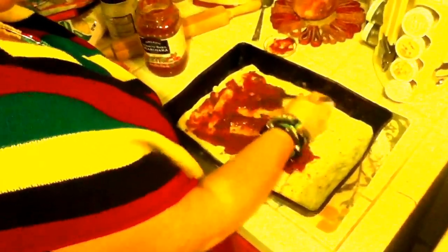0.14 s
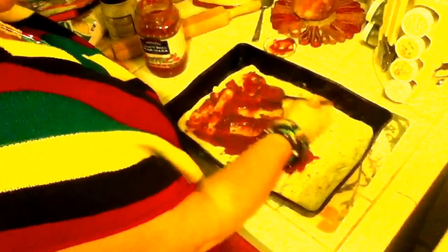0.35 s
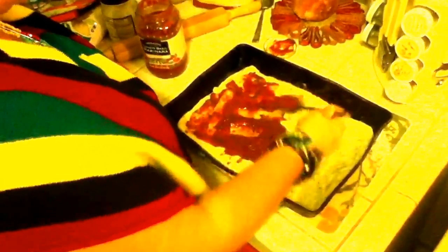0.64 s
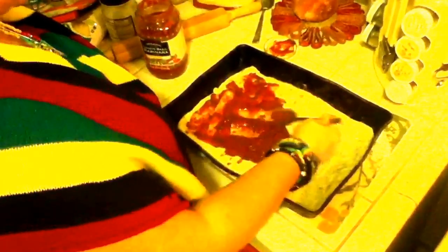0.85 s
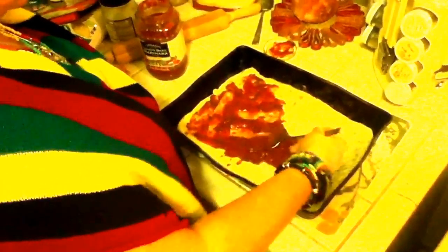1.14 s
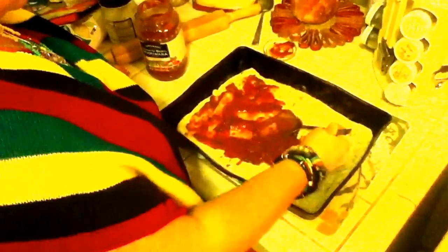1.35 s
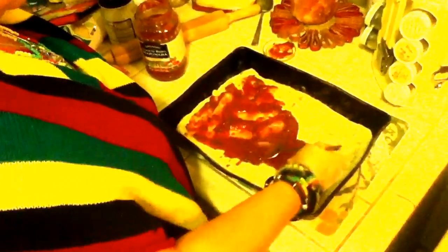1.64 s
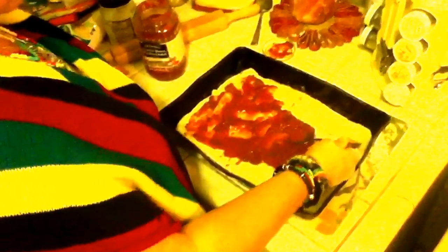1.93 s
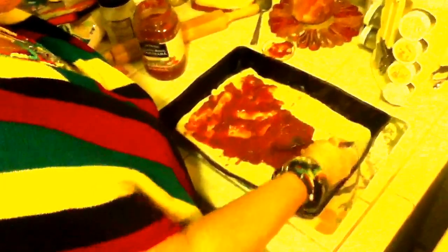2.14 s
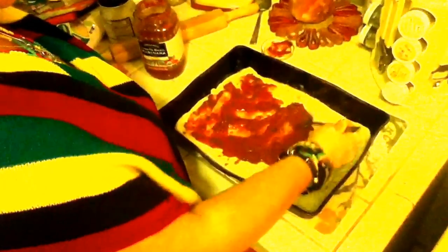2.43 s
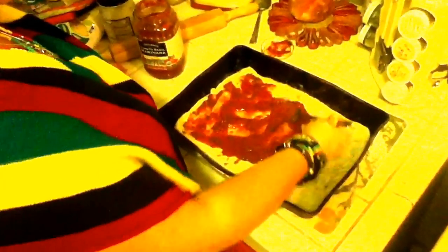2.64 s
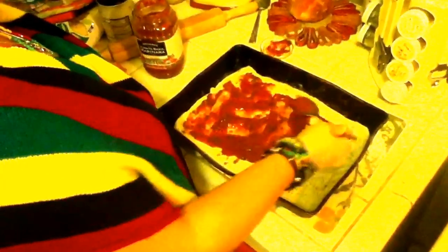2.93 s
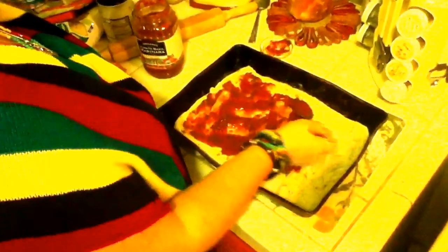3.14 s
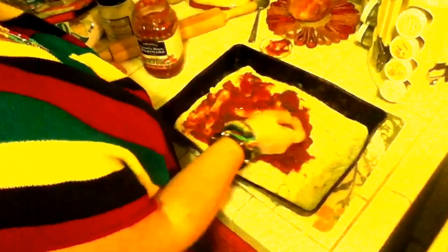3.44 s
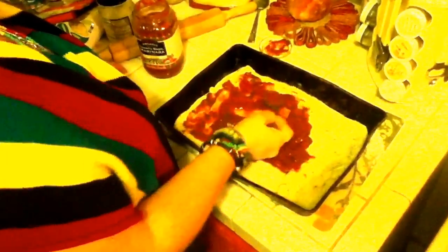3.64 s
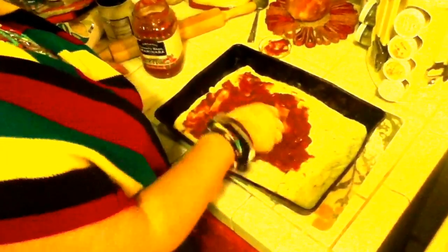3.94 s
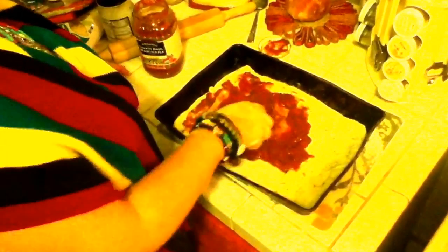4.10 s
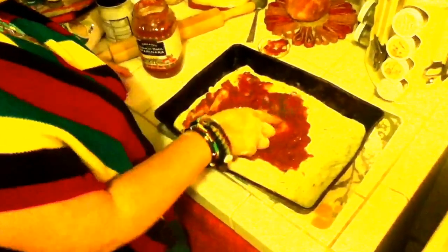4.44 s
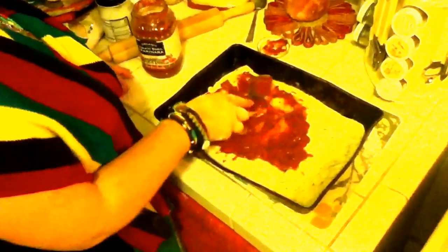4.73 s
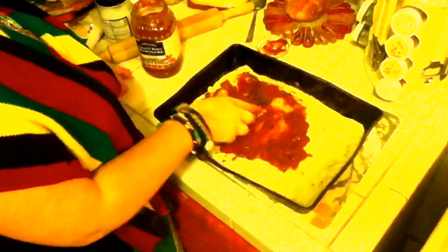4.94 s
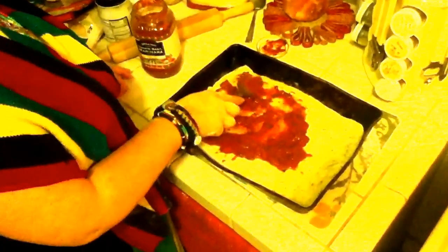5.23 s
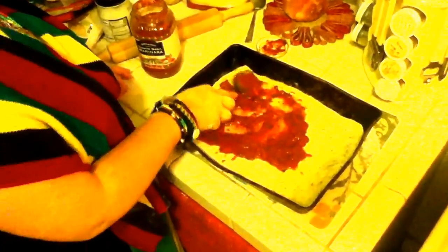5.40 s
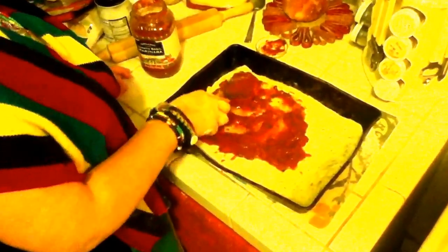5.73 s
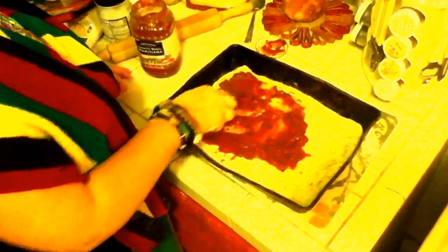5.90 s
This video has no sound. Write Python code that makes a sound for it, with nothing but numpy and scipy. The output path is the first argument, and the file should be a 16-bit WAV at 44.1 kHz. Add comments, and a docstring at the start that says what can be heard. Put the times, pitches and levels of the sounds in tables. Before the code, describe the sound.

A thin metal baking pan knocks, clatters and scrapes on a tiled kitchen counter over a low hum and hiss.

```python
"""Sauce is spread over dough in a thin metal baking pan on a tiled kitchen counter.
Over a bed of rumble, mains hum and hiss, the pushing hand scrapes the pan briefly and bracelets tick.
Around 2 s the pan rocks and clatters down on the tiles, ringing in its modes, as the hum swells.
From 3.7 s come lighter knocks and stick-slip scrapes, a faint soft rasp of sauce on the dough at 4.1 s
and one more bracelet click. The small hard room answers each contact."""
import sys
import numpy as np
from scipy import signal
from scipy.fft import rfft, irfft, next_fast_len
from scipy.io import wavfile
from scipy.ndimage import uniform_filter1d

SR = 44100
rng = np.random.default_rng(int(sys.argv[2]) if len(sys.argv) > 2 else 0)


def unload_wav(signal):
    """Save mono or channel-first audio to the path in sys.argv[1] as 16-bit WAV at rate SR, clipped to [-1, 1]."""
    wavfile.write(
        sys.argv[1],
        SR,
        np.round(np.clip(np.atleast_2d(signal).T, -1, 1) * 32767).astype(np.int16),
    )


N = 267246
TIME = np.arange(N) / SR
RING = np.arange(SR // 3) / SR  # time since a contact [s]


def amp(db):
    """Decibels to linear gain."""
    return 10 ** (np.asarray(db) / 20)


def unit(x):
    """Scale to rms 1."""
    return x / np.sqrt(np.mean(x ** 2) + 1e-20)


def normed(x):
    """Scale to energy 1."""
    return x / (np.linalg.norm(x) + 1e-20)


def along(points, hz):
    """Read a curve of (frequency [Hz], value) points on a log frequency axis."""
    f, v = np.transpose(points)
    return np.interp(np.log(hz + 1), np.log(f + 1), v)


def coloured(x, gain_db):
    """Minimum-phase EQ whose gain in dB is a function of frequency."""
    m = 2 * next_fast_len(len(x) // 2 + SR // 16)
    cepstrum = irfft(np.log(amp(gain_db(np.fft.rfftfreq(m, 1 / SR))) + 1e-6))
    cepstrum[1:m // 2] *= 2
    cepstrum[m // 2 + 1:] = 0
    return irfft(rfft(x, m) * np.exp(rfft(cepstrum)))[:len(x)]


def shaped(x, points):
    """EQ drawn through (frequency [Hz], gain [dB]) points."""
    return coloured(x, lambda hz: along(points, hz))


def evened(x, spectrum, width_hz=200):
    """Pull the broad bands of x onto a spectrum; the fine structure stays."""
    power = uniform_filter1d(np.abs(rfft(x)) ** 2, max(1, round(width_hz * len(x) / SR)))
    grid = np.fft.rfftfreq(len(x), 1 / SR)
    band_db = lambda hz: 10 * np.log10(np.interp(hz, grid, np.abs(power)) + 1e-9)
    return normed(coloured(x, lambda hz: along(spectrum, hz) - band_db(hz)))


def dying_noise(t60_points):
    """Noise of energy 1 in which each frequency dies at its own speed."""
    hz, t, bands = signal.stft(rng.standard_normal(len(RING)), SR, nperseg=128)
    decay = amp(-60 * t / along(t60_points, hz)[:, None])
    return normed(signal.istft(bands * decay, SR, nperseg=128)[1][:len(RING)])


def add(track, start, sound):
    """Mix a sound in at a start time in seconds."""
    part = track[max(round(start * SR), 0):][:len(sound)]
    part += sound[:len(part)]


def room_tone(rumble_db=-56, hiss_db=-56.5, hum_db=-65.5, whine_db=-80, split_hz=400):
    """Steady rumble, microphone hiss and a thin electric whine, with a mains hum that swells once."""
    # noise bed: (frequency [Hz], spectral density [dB])
    bed_spectrum = [(15, -56), (25, -24), (60, -9.5), (105, -6), (170, -6.5), (222, -4), (260, -8.5),
                    (360, -12.5), (570, -18), (820, -19.5), (1100, -23.5), (1600, -25), (2600, -25),
                    (5000, -27.5), (9000, -27.5), (15700, -34)]
    mains_hz, whine_hz = 120, 15000
    swell_db, peak_s, rise_s, ebb_s = 7, 2.23, .6, 2.4
    m = next_fast_len(N)
    hz = np.fft.rfftfreq(m, 1 / SR)
    noise = rfft(rng.standard_normal(m)) * amp(along(bed_spectrum, hz))
    lowpass = 1 / (1 + (hz / split_hz) ** 4)
    rumble = unit(irfft(noise * lowpass, m)[:N])
    hiss = unit(irfft(noise * (1 - lowpass), m)[:N])
    tone = lambda pitch: unit(np.sin(2 * np.pi * (pitch * TIME + rng.random())))
    swell = np.exp(-((TIME - peak_s) / np.where(TIME < peak_s, rise_s, ebb_s)) ** 2)
    hum = amp(hum_db + swell_db * swell) * tone(mains_hz)
    return amp(rumble_db) * rumble + amp(hiss_db) * hiss + hum + amp(whine_db) * tone(whine_hz)


def scrapes_and_sauce(groan_trim_db=-1, grit_trim_db=-6, modes_db=-5, attack_s=0.019, release_s=0.021):
    """Friction: the pan groans and grates over the tiles; sauce spread on the dough rasps softly."""
    # strokes: (start [s], length [s], groan [dB], grit [dB], swell to the end [dB], belly [dB])
    # the long, faint one at 4.06 s is the sauce; the others are the pan
    strokes = [(.775, .095, -55, -54.5, 0, 8), (1.89, .075, -37.5, -52, 5, -5),
               (2.221, 0.088, -46.5, -54, 1, -2), (3.765, .165, -43, -50, -3, 3.5),
               (4.06, 0.31, -68.5, -59.5, -2, 0), (4.53, .155, -42, -49.5, -7, 2.5),
               (4.67, .14, -54, -57.5, -5, -3.5), (5.16, .085, -47.5, -65, 6, -11),
               (5.419, 0.17, -50.5, -62, 0, -8)]
    # tone of the groan: (frequency [Hz], gain [dB])
    groan_eq = [(150, -21.5), (250, -6), (420, -11.5), (520, -1.5), (650, -7.5), (830, -1.5), (1020, 1.5),
                (1270, -4.5), (1560, -4.5), (2200, -9), (3100, -17.5), (4200, -23.5), (6000, -30)]
    # tone of the rasp: (frequency [Hz], gain [dB])
    grit_eq = [(1500, -12), (3000, 7.5), (4600, 3), (5800, -0.5), (7800, 1), (10000, -5), (15000, -26)]
    out = np.zeros(N)
    for start, length, groan_db, grit_db, swell_db, belly_db in strokes:
        t = np.arange(0, length, 1 / SR)
        fades = np.clip(np.minimum(t / attack_s, (length - t) / release_s), 0, 1)
        envelope = fades * amp(swell_db * (t / length - .5))
        jerks = unit(stick_slip(len(t), per_second=1800, spread_db=4.5))
        grit = unit(shaped(stick_slip(len(t), per_second=3700, spread_db=4), grit_eq))
        body = normed(shaped(bending_wave(), groan_eq))
        body += amp(modes_db) * normed(shaped(pan_ring(), groan_eq))
        body = normed(shaped(body, [(650, belly_db), (1000, 0)]))  # low shelf
        groan = signal.fftconvolve(amp(groan_db + groan_trim_db) * envelope * jerks, body)
        rasp = amp(grit_db + grit_trim_db) * envelope * grit
        add(out, start, in_kitchen(groan, wet_db=-5))
        add(out, start, in_kitchen(rasp, wet_db=1.5))
    return out


def stick_slip(size, per_second, spread_db):
    """Friction catches and lets go: tiny jerks at random moments and of uneven size."""
    jerks = rng.random(size) < per_second / SR
    return jerks * rng.choice([-1, 1], size) * amp(spread_db * rng.standard_normal(size))


def bending_wave(delay_at_1khz_s=0.001225):
    """An impulse crosses the metal sheet and smears into a chirp: the treble runs ahead."""
    hz = np.fft.rfftfreq(len(RING), 1 / SR)
    phase = 4 * np.pi * np.sqrt(1000 * hz) * delay_at_1khz_s
    return normed(irfft(np.exp(-1j * phase), len(RING)))


def pan_ring(scatter_db=2):
    """The ring of the pan; each contact point stirs the modes differently."""
    # the pan's clearest modes: (frequency [Hz], relative level [dB], t60 [s])
    modes = [(530, -13, .25), (557, -9, .3), (781, -6, .35), (817, -6, .35), (948, -4, .3),
             (1040, -11, .25), (1238, 0, .32), (1280, 0, .35), (1354, 1, .32), (1425, -4, .3),
             (1448, -4, .3), (1680, -7, .3), (1775, -8, .25), (1958, -8, .22), (2064, -4, .25),
             (2196, -4, .22), (2319, -1, .2), (2517, -6, .2), (2776, -4, .22), (3332, -12, .16),
             (3846, -12, .18), (4400, -15, .16), (4683, -14, .16)]
    hz, db, t60 = np.transpose(modes)[:, :, None]
    strength = amp(db + scatter_db * rng.standard_normal(hz.shape))
    phase = rng.uniform(0, 2 * np.pi, hz.shape)
    decay = np.exp(-np.log(1000) * RING / t60)
    return normed(np.sum(strength * decay * np.sin(2 * np.pi * hz * RING + phase), axis=0))


def in_kitchen(x, wet_db, build_s=0.00054):
    """A sound plus the tiled room's answer, a new tail for each place of contact."""
    # reverb decay: (frequency [Hz], t60 [s])
    reverb_times = [(300, 0.4), (800, 0.35), (2100, 0.32), (5500, 0.27), (12000, 0.19)]
    room = amp(wet_db) * normed(dying_noise(reverb_times) * (1 - np.exp(-RING / build_s)))
    room[0] += 1  # direct sound
    return signal.fftconvolve(x, room)


def bracelet_ticks(contact_s=0.0048, gain_db=15.5, skirt_db=-20):
    """Small hard beads meet with a bright click and a brief buzz."""
    # bead hits: (time [s], relative level [dB], centre [Hz], width [octaves])
    ticks = [(0.847, -47, 9000, 0.27), (1.22, -35, 10200, .22), (5.0864, -26.5, 7600, 0.5)]
    out = np.zeros(N)
    for start, db, centre_hz, octaves in ticks:
        burst = normed(rng.standard_normal(len(RING)) * np.exp(-(RING / contact_s) ** 2))
        add(burst, contact_s / 2, [1.0])  # the click inside the buzz
        bell = lambda hz: np.exp(-.5 * (np.log2((hz + 1) / centre_hz) / octaves) ** 2)
        tick = normed(coloured(burst, lambda hz: 20 * np.log10(bell(hz) + amp(skirt_db))))
        add(out, start, amp(db + gain_db) * in_kitchen(tick, wet_db=-3.5))
    return out


def pan_knocks(strike_db=-3, sheet_db=-2.0, modes_db=-3.8, gain_db=21.5, clean_hit_s=0.0039):
    """The rim strikes and chatters for a few ms; the dough soon damps the sheet, a few modes ring on."""
    # the pan lands on the tiles: (time [s], relative level [dB], hardness [dB], chatter [s])
    hits = [(1.7958, -9, 2.5, 0.0079), (1.938, -25.5, -3, .008), (1.9477, -21.5, 3, .015),
            (2.1013, -18, 8, 0.011), (2.1073, -15, -3, 0.0043), (2.1901, -15.5, 0, 0.004),
            (2.2015, -21.5, -20, .0025), (2.2752, -21.5, -1, 0.0085), (3.7462, -39.5, 0.5, 0.0045),
            (3.8486, -37, -7, 0.0028), (3.8776, -29, -10, .008), (3.9, -31.5, -6, .009),
            (4.5045, -22, 7.5, .0009), (4.5976, -28, -4, .006), (4.6463, -34.5, -5, 0.0075),
            (4.793, -35.5, -17, 0.0028), (5.045, -26.5, 1.5, .0062), (5.197, -36, -11, .0025),
            (5.2247, -37, -18, .003), (5.5863, -27, -14, 0.0015)]
    # the sheet's crowd of short-lived modes: (frequency [Hz], spectral density [dB])
    sheet_spectrum = [(100, -39), (250, -11), (450, -15.5), (560, -11), (660, -8.5), (950, -0.5), (1350, 3),
                      (1650, -2.5), (2300, 1), (3300, -7), (4700, -11), (5300, -16), (8000, -21.5),
                      (11000, -36), (16000, -56)]
    # their decay under the dough: (frequency [Hz], t60 [s])
    sheet_damping = [(600, 0.061), (1400, 0.05), (3000, 0.034), (8000, 0.022)]
    out, strike = np.zeros(N), bending_wave()
    for start, db, hard_db, chatter_s in hits:
        buzz = normed(np.exp(-(RING / chatter_s) ** 2) * rng.standard_normal(len(RING)))
        clean = min(1, clean_hit_s / chatter_s)  # long chatter softens the first strike
        contact = clean * amp(strike_db) * strike + buzz + amp(sheet_db) * dying_noise(sheet_damping)
        clash = in_kitchen(contact, wet_db=-4.5)[:len(RING)]
        blow = evened(clash, sheet_spectrum) + amp(modes_db) * pan_ring()
        add(out, start, amp(db + gain_db) * shaped(blow, knock_eq(db, hard_db, chatter_s)))
    return out


def knock_eq(db, hard_db, chatter_s, middling_db=-21, crack_loss_db_per_s=350):
    """Colour of one blow: a light landing sounds hollow, a hard, forceful and short one cracks."""
    force_db = db - middling_db
    belly_db = -1 - 0.2948 * force_db
    crack_db = -1 + 0.456 * force_db + hard_db - crack_loss_db_per_s * chatter_s
    return [(850, belly_db), (1250, 0), (1500, 0), (2600, hard_db), (7000, crack_db)]


def scene():
    """Everything at one microphone above the counter."""
    return (room_tone() + pan_knocks() + scrapes_and_sauce() + bracelet_ticks())[None]


def record(dry):
    """A brick-wall low-pass takes off the very top."""
    top_hz = 15800
    m = next_fast_len(N + SR // 2)
    passband = np.fft.rfftfreq(m, 1 / SR) < top_hz
    return irfft(rfft(dry, m) * passband, m)[..., :N]


dry = scene()
out = record(dry)
unload_wav(out)
```